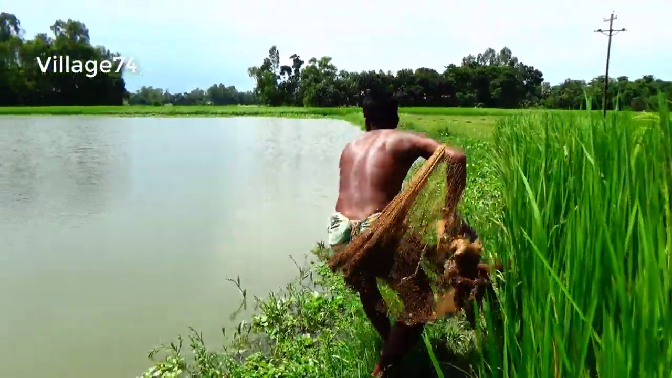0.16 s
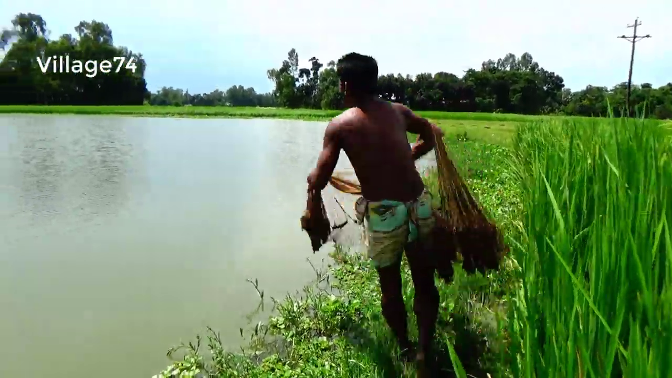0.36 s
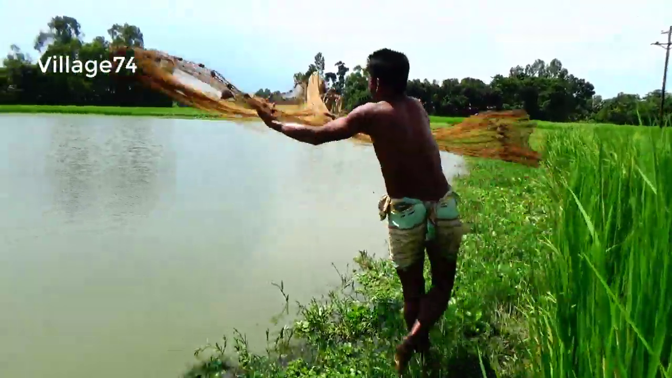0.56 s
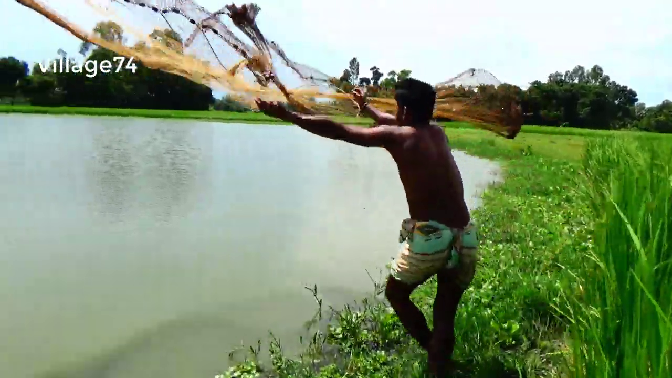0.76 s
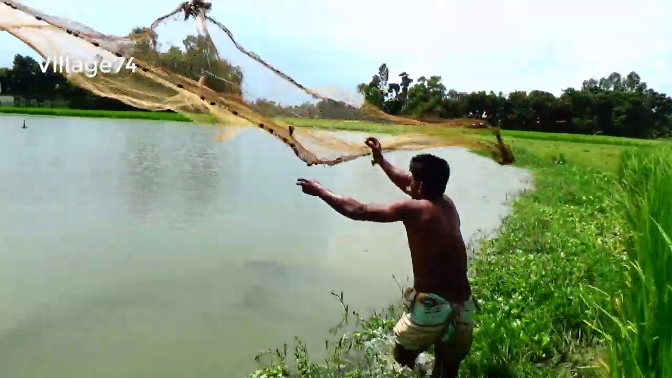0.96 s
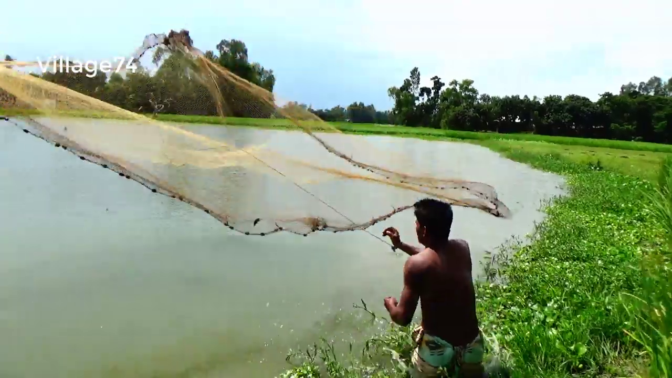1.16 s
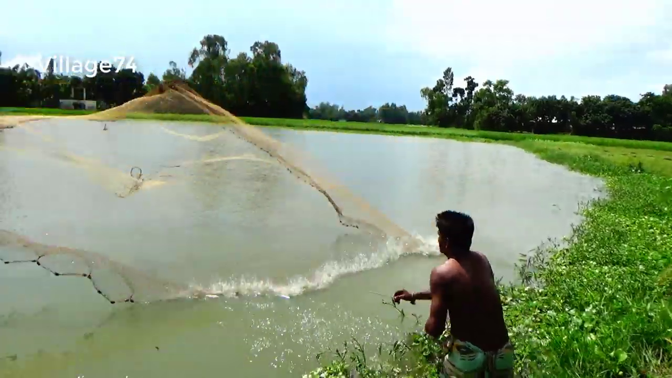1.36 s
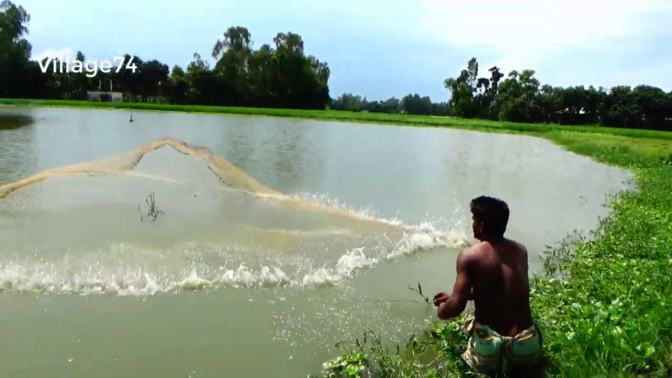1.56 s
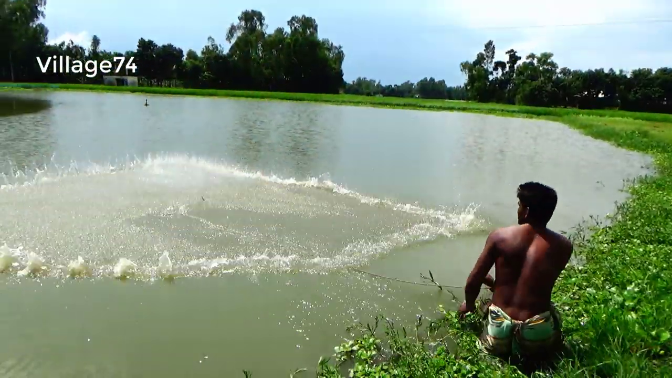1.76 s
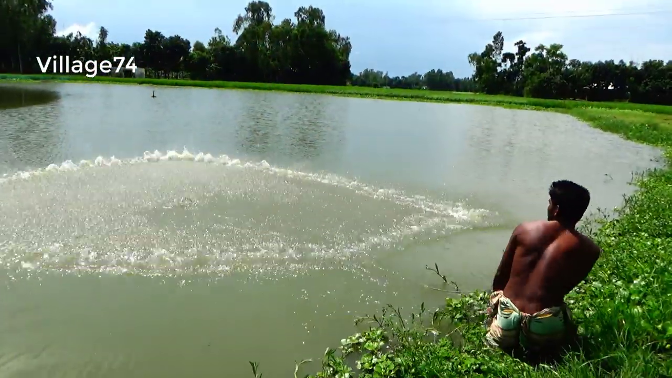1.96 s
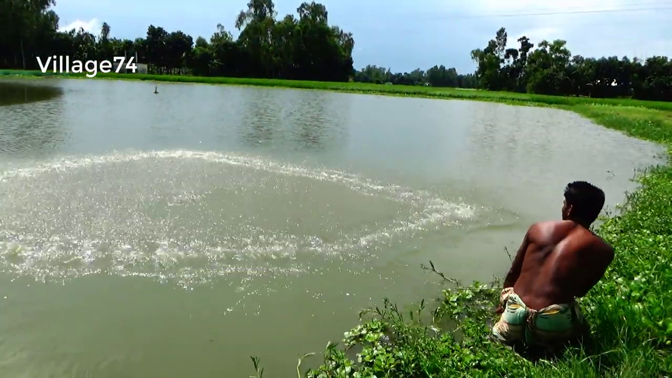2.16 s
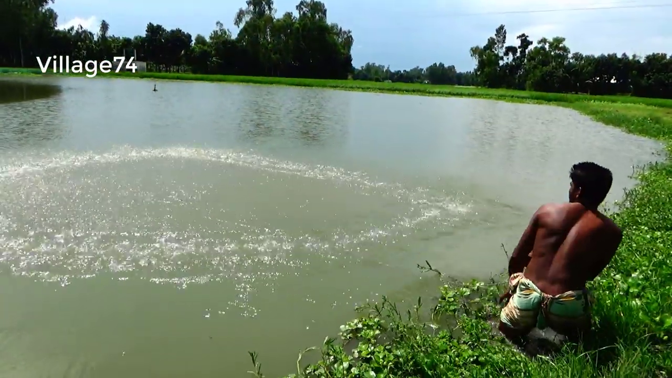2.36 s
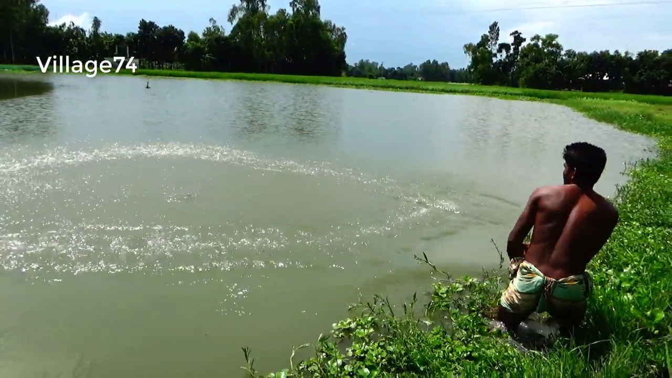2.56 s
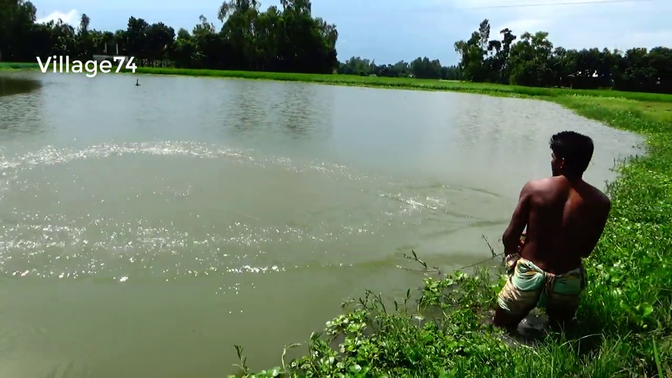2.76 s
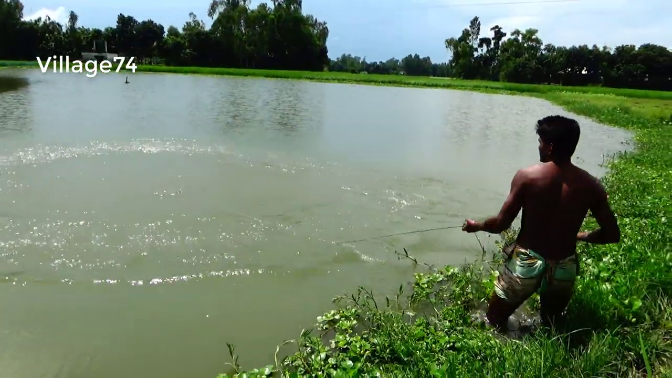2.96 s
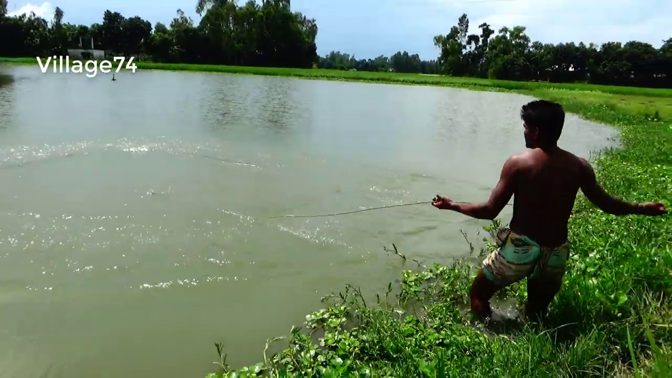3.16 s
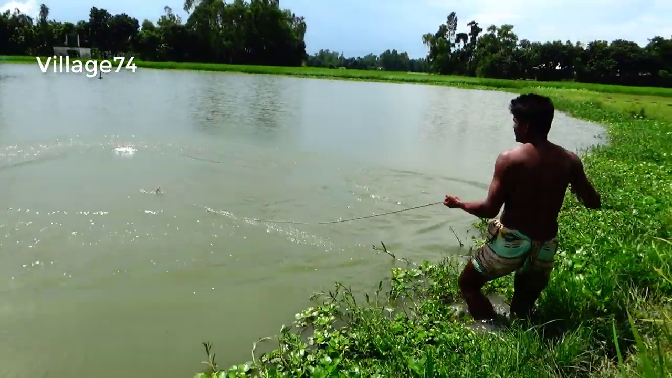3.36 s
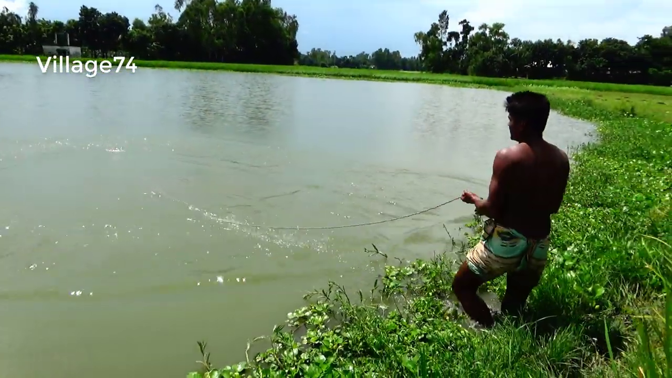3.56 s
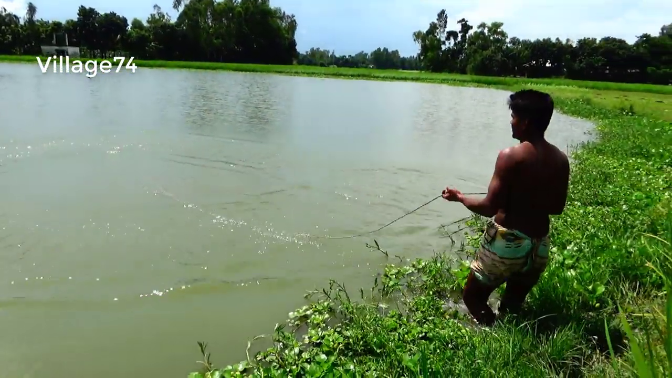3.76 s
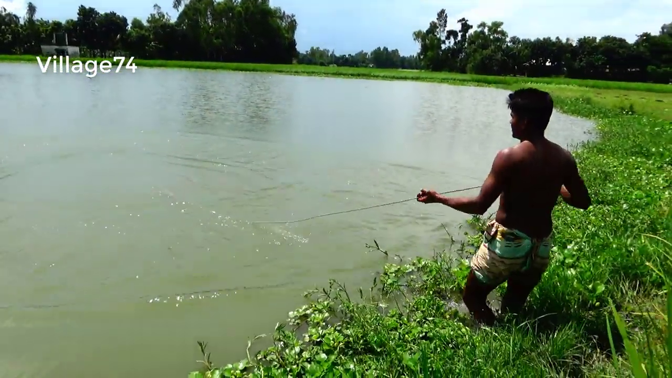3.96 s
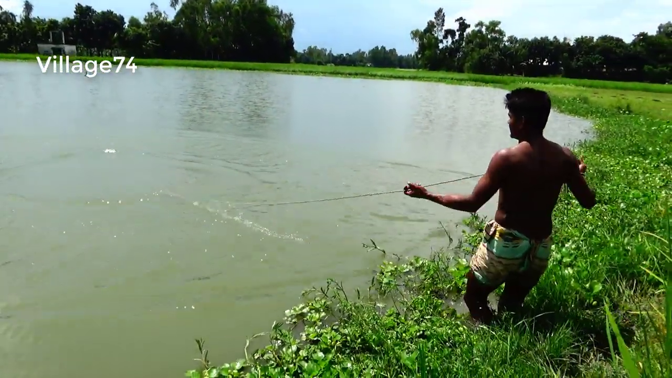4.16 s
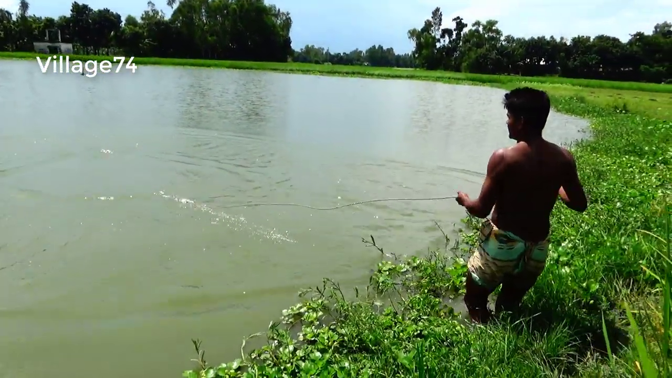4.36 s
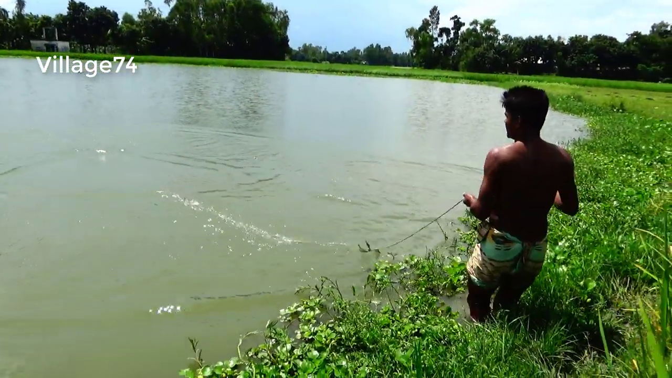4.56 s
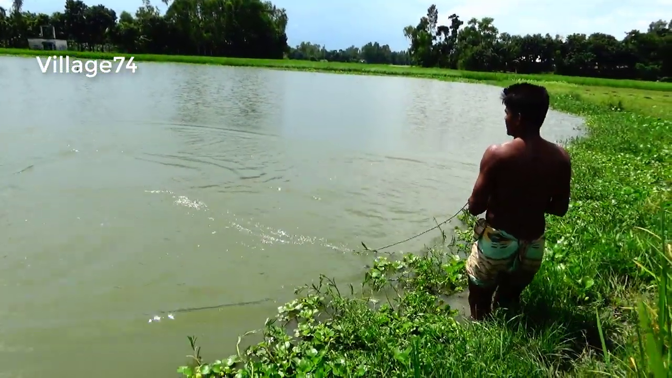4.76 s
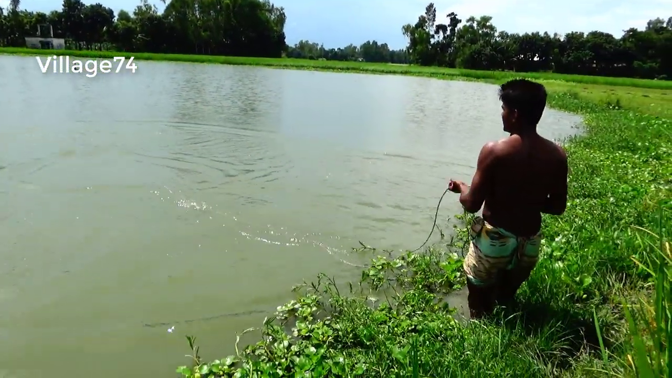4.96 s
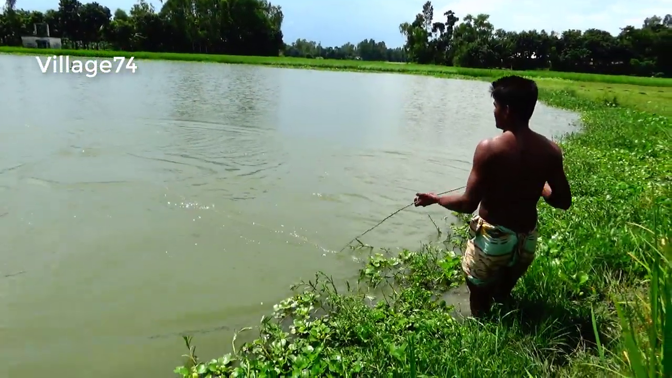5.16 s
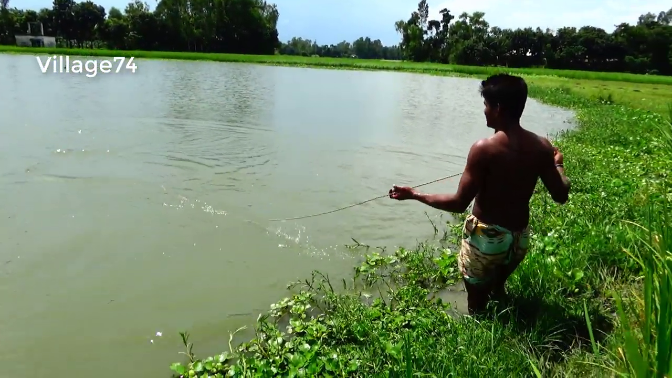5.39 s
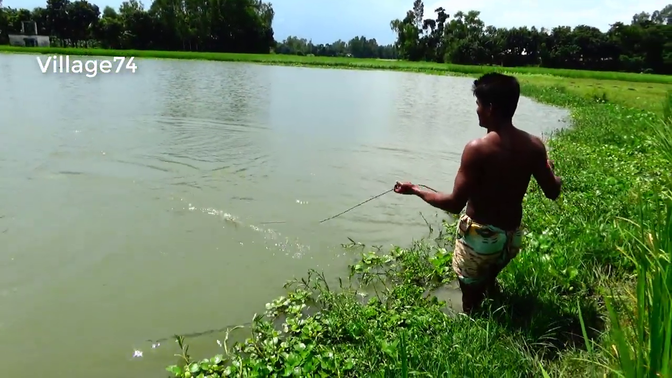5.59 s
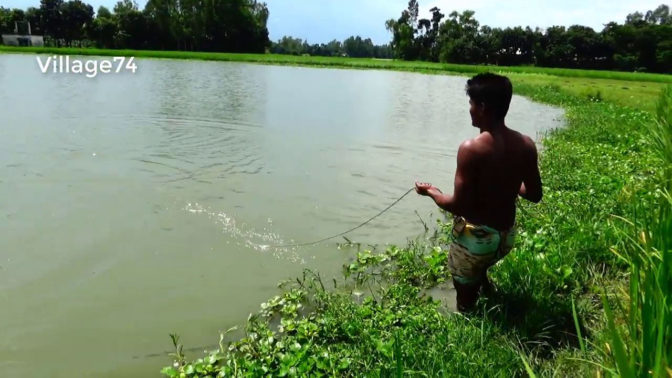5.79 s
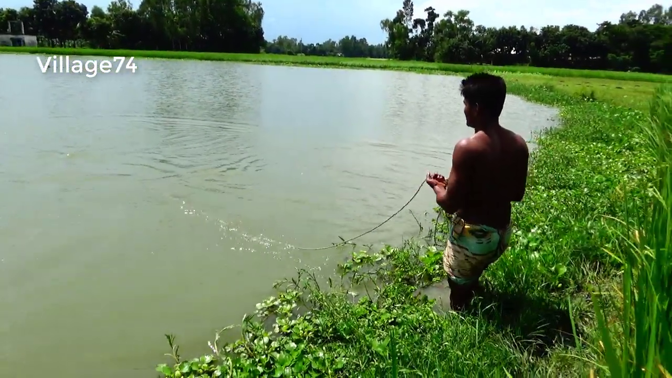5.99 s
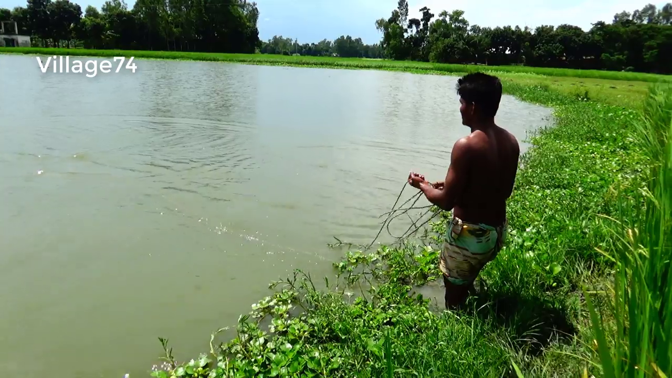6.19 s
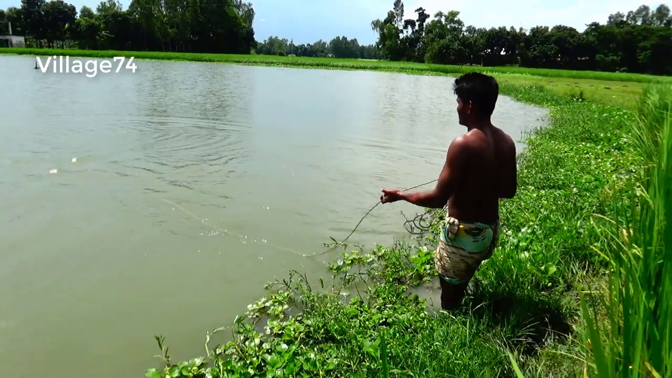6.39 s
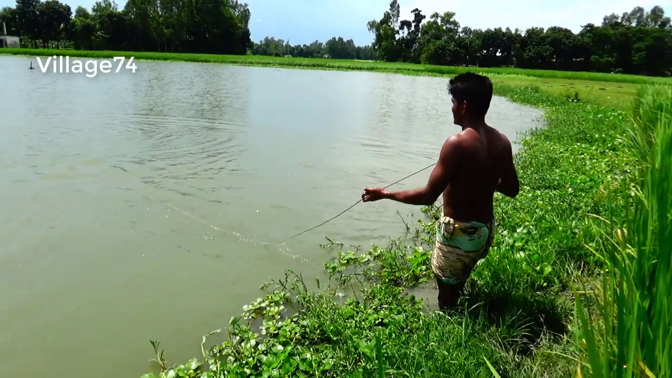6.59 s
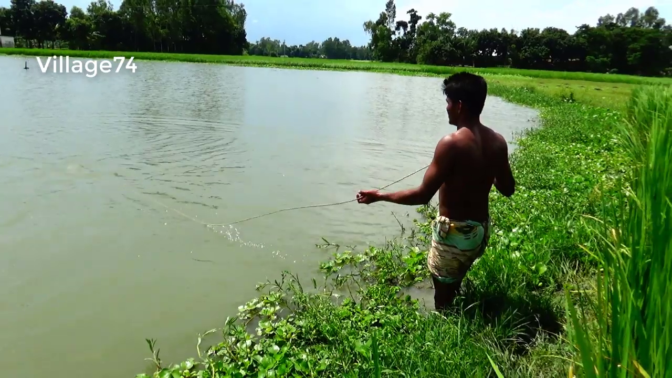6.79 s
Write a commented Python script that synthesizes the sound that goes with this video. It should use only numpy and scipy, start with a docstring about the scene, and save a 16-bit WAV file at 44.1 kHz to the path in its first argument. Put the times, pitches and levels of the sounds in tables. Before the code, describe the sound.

Close beside an open pond, wet mesh swishes with a bright rattle of small weights, then water spatters and the net lands in a broad, rushing splash full of plops and bubbles. The splash fades quickly to thin foam fizz, sparse drips and ticks from the line and weeds. A soft, wide outdoor hush and low wind buffeting on the microphone continue throughout.

```python
"""At the edge of a pond, in a light breeze, a wet cast net is swung and thrown out over the water.
Noise-like mesh rustles, sinkers clink as short metal partials, and shed water patters as tiny impacts.
The rim plunges in with ringing cavities, clouds of chirping bubbles and spray, opening to the left.
Foam fizzes out while the thrower shifts in the weedy shallows and draws in the line, with drips and ticks.
Behind it lie a far, wide hush and low wind rumble on the microphone."""
import sys
import numpy as np
from scipy import signal
from scipy.fft import rfft, irfft, next_fast_len
from scipy.io import wavfile

SR = 44100
rng = np.random.default_rng(int(sys.argv[2]) if len(sys.argv) > 2 else 0)


def master(y):
    """Save y as 16-bit WAV."""
    cut = np.clip(np.atleast_2d(y).T, -1, 1)
    pcm = np.round(cut * 32767)  # scale
    wavfile.write(sys.argv[1], SR, pcm.astype(np.int16))


N = 301203  # samples


def amp(db):
    """Decibels to gain."""
    return 10 ** (np.asarray(db) / 20)


def unit(x):
    """Scales to rms 1."""
    return x / np.sqrt(np.mean(x ** 2) + 1e-20)


def colour(x, points):
    """Filters a steady sound through a spectrum curve, at rms 1."""
    hz, db = np.transpose(points)
    size = next_fast_len(N)
    log_f = np.log(np.fft.rfftfreq(size, 1 / SR) + 1)
    # beyond the end points the curve falls 20 dB per factor e in frequency
    skirts = np.maximum(np.log(hz[0]) - log_f, 0) + np.maximum(log_f - np.log(hz[-1]), 0)
    gain = amp(np.interp(log_f, np.log(hz), db) - 20 * skirts)
    return unit(irfft(rfft(x, size) * gain, size)[..., :N])


def band(x, low_hz, high_hz):
    """Keeps one band, with gentle skirts."""
    sos = signal.butter(2, [low_hz, min(high_hz, SR / 2.2)], "band", fs=SR, output="sos")
    return signal.sosfilt(sos, x)


def spread(pair, side_db, width=None):
    """Two unrelated sounds become the middle and the side of a stereo image."""
    # how wide the near sounds stand: frequency_hz, relative_side_db
    near_width = [(60, -16), (300, -1), (900, 1), (3000, 2), (6000, 1.5), (9500, 7.5), (11500, -59),
                  (15800, -61)]
    hz, db = np.transpose(near_width if width is None else width)
    size = next_fast_len(N)
    width_db = np.interp(np.log(np.fft.rfftfreq(size, 1 / SR) + 1), np.log(hz), db)
    side = irfft(rfft(pair[1], size) * amp(side_db + width_db), size)[:N]
    return np.array([pair[0] + side, pair[0] - side])


def add(mix, s, sound):
    """Mixes a sound in at s seconds."""
    part = mix[max(round(s * SR), 0):][:len(sound)]
    part += sound[:len(part)]


def together(gains):
    """Unrelated sounds add in power."""
    return np.sqrt(sum(gain ** 2 for gain in gains))


def after(s, fade_db_per_s):
    """Full gain up to a moment, then a steady fade."""
    return amp(-fade_db_per_s * np.maximum(np.arange(N) / SR - s, 0))


def swell(start, rise, hold, fade_db_per_s, lead=1):
    """Gain that rises, holds and dies away; a lead under 1 makes the rise come sooner."""
    rising = np.clip((np.arange(N) / SR - start) / rise, 0, 1) ** lead
    return rising * after(start + rise + hold, fade_db_per_s)


def bump(s, spread_s):
    """Bell-shaped gain around one moment, spread_s being its standard deviation."""
    return np.exp(-np.minimum(((np.arange(N) / SR - s) / spread_s) ** 2 / 2, 20))


def impacts(per_s, scatter_db):
    """Two random trains of tiny impacts; scatter makes most small and a few large."""
    size = amp(scatter_db * np.minimum(rng.exponential(1, (2, N)), 4))
    sign = rng.choice([-1, 1], (2, N))
    return size * sign * (rng.random((2, N)) < per_s / SR)


def clumps(x, depth_db, seconds, width_hz):
    """A sound comes in clumps: random gains drift over time and pitch."""
    z = signal.stft(x, nperseg=256, noverlap=192)[2]
    field = rng.standard_normal(z.shape[1:])
    bins = max(width_hz * 256 / SR, 1)
    frames = max(seconds * SR / 64, 1)
    for axis, reach in enumerate([bins, frames]):
        field = signal.lfilter([1], [1, -np.exp(-1 / reach)], field, axis=axis)
    gained = z * amp(depth_db * unit(field))
    return unit(signal.istft(gained, nperseg=256, noverlap=192)[1][:, :N])


def burst(hz, octaves, t60, attack, size=8192):
    """A puff of noise around a centre pitch, dying 60 dB in t60 s, with a peak near 1."""
    t, f = np.arange(size) / SR, np.fft.rfftfreq(size, 1 / SR) + 1
    noise = irfft(rfft(rng.standard_normal(size)) / (1 + (np.log2(f / hz) / octaves) ** 4))
    shape = amp(-60 * t / t60) * (1 - np.exp(-t / attack))
    return unit(noise) * shape / shape.max() / 2


def bubble(hz, cycles, rise, onset):
    """A trapped air pocket rings for some cycles and climbs in pitch as it nears the surface."""
    age = np.arange(int(6 * cycles / hz * SR)) * hz / SR  # in cycles
    ring = np.exp(-age / cycles) * (1 - np.exp(-(age / onset) ** 2))
    return ring / ring.max() * np.sin(2 * np.pi * age * (1 + rise * (age / cycles / 2 - 1)))


def cloud(low_hz, high_hz, per_s, cycles, scatter_db, count=36):
    """Many bubbles of all sizes, each size with its own random births."""
    births = impacts(per_s, scatter_db)
    kind = rng.integers(0, count, (2, N))
    out = np.zeros((2, N))
    for k, hz in enumerate(np.geomspace(low_hz, high_hz, count)):
        ring = bubble(hz, cycles, rise=0.033, onset=0.43)
        # strength in proportion to pitch
        out += signal.oaconvolve(births * (kind == k), hz * ring[None], axes=1)[:, :N]
    return out


def bank(x, wet_db, t60, size=12000):
    """Faint, short scatter from the bank and the water, different in each channel."""
    sparse = rng.standard_normal((2, size)) * (rng.random((2, size)) < .05)
    taps = sparse * amp(-60 * np.arange(size) / SR / t60)
    taps /= np.linalg.norm(taps, axis=1, keepdims=True)
    return x + amp(wet_db) * signal.oaconvolve(x * np.ones((2, 1)), taps, axes=1)[:, :N]


def breeze_level(eddies_per_s, eddy_db):
    """A slowly changing breeze, made lumpy by random eddies, with gusts on top."""
    # steady strength of the breeze on the microphone: time_s, level_db
    steady_breeze = [(0, -58), (.4, -76), (.85, -62), (1.05, -55.5), (2.4, -45), (3.05, -47), (4.0, -50),
                     (5.5, -50.5), (5.9, -57), (6.83, -53.5)]
    # gusts on top of it: centre_s, level_db, spread_s
    gusts = [(0.116, -52, 0.068), (1.733, -41.5, 0.038), (1.905, -39, 0.023), (2.205, -40.5, 0.047),
             (3.27, -39.5, 0.066), (3.425, -36.5, 0.017), (3.687, -41.5, 0.049), (3.79, -37, 0.025),
             (4.822, -40, 0.023), (5.145, -44, 0.025), (5.39, -42, 0.015), (6.687, -53, 0.043)]
    t = np.arange(N) / SR
    rates = eddies_per_s * np.geomspace(.5, 2, num=8)
    eddies = unit(sum(np.sin(2 * np.pi * (rate * t + rng.random())) for rate in rates))
    steady = amp(np.interp(t, *np.transpose(steady_breeze)) + eddy_db * eddies)
    return together([steady] + [amp(db) * bump(s, spread_s) for s, db, spread_s in gusts])


def outdoors():
    """Steady far hush of the fields as wide noise, with the breeze rumbling on the microphone."""
    # far hush: frequency_hz, relative_level_db
    air_colour = [(24, -39), (40, -18), (162, -4.5), (380, -11), (431, -11.5), (539, -13.5), (728, -14),
                  (1330, -18.5), (1470, -18.5), (2420, -21.5), (8890, -24.5), (15800, -35.5)]
    # the hush comes from all round: frequency_hz, relative_side_db
    air_width = [(60, -26), (200, -11), (400, -1.5), (900, 3), (2400, -1), (8000, -3.5), (15000, -42)]
    # wind rumble: frequency_hz, relative_level_db
    breeze_colour = [(15, -2.5), (30, -6.5), (55, 0), (90, -4), (140, -9.5), (250, -17), (600, -27)]
    air = spread(colour(rng.standard_normal((2, N)), air_colour), side_db=-0.5, width=air_width)
    breeze = spread(colour(rng.standard_normal((2, N)), breeze_colour), side_db=-2.5)
    return amp(-49.5) * air + breeze * breeze_level(eddies_per_s=3.7, eddy_db=0.5)


def mesh_level():
    """Each pull makes the mesh swish up and die away, until it sinks."""
    # pulls on the wet mesh: carrying, backswing, throw, release, opening out, near side landing,
    # far side landing, sinking: start_s, rise_s, relative_level_db, fade_db_per_s
    swishes = [(-0.04, 0.038, -38, 1), (.05, 0.2, -28, 81), (.345, 0.026, -28.5, 62),
               (0.728, 0.003, -30.5, 7), (1.04, 0.024, -23.5, 32), (1.321, 0.033, -17, 24.5),
               (1.655, 0.043, -18.5, 117), (1.88, 0.038, -24, 26)]
    pulls = together(amp(db) * swell(s, rise, 0, fade) for s, rise, db, fade in swishes)
    return pulls * after(1.8, fade_db_per_s=12)  # quieter as it slips under


def swing():
    """The mesh swishes as dense impacts while sinkers knock and rattle against their neighbours."""
    # wet mesh: frequency_hz, relative_level_db
    mesh_colour = [(600, -17.5), (1700, -12), (4000, -11), (6000, -10.5), (7500, -4), (9300, 0.5),
                   (10500, -3.5), (12500, -12), (15800, -23)]
    # sinkers knocking together: start_s, relative_peak_db, pitch_hz, rattle_s
    knocks = [(0.088, -20, 8950, 0.0032), (0.264, 0.5, 8330, .008), (0.286, -1.5, 8800, .007),
              (0.302, -13, 8600, 0.0096), (0.363, -22, 9920, 0.027), (0.3895, -7, 9060, 0.0037),
              (0.434, -17, 9200, .003), (0.467, -19, 9400, 0.0093), (0.477, -18.5, 7150, 0.0053),
              (0.6402, -23, 9160, 0.003)]
    # what a sinker rings with: multiple_of_pitch, relative_level_db
    partials = [(0.62, -5), (0.85, 1), (1, 6), (1.121, 6), (1.36, -4)]
    clinks, t = np.zeros(N), np.arange(1024) / SR
    for s, db, hz, rattle in knocks:
        # one knock, then seven within the rattle time, weaker the later they come
        for delay in np.append(0, np.sort(rng.uniform(0.13, 1, size=7))):
            detune = 1 + 0.19 * delay * rng.standard_normal()  # no two sinkers are quite alike
            ring = sum(amp(d) * np.sin(2 * np.pi * (hz * detune * m * t + rng.random()))
                       for m, d in partials)
            decay = amp(db - 20 * np.sqrt(delay) - 60 * t / 0.0083)
            add(clinks, s + delay * rattle, decay * ring / abs(ring).max())
        add(clinks, s, amp(db - 20) * burst(hz=6840, octaves=0.76, t60=0.054, attack=0.0002))
    mesh = colour(impacts(per_s=8000, scatter_db=3.0), mesh_colour)
    mesh = clumps(mesh, depth_db=1.93, seconds=0.0078, width_hz=3100)
    mesh = spread(mesh, side_db=-20.5) * mesh_level()
    return amp(-2.5) * mesh + amp(5) * band(clinks, low_hz=2580, high_hz=13000)


def surge_levels():
    """Every surge drives spray, small bubbles and churning; gulps add to the churning."""
    # water coming down: first spatter at the release, shower from the flying net, near rim landing,
    # far rim landing, thrown water falling back: start_s, rise_s, hold_s, fade_db_per_s,
    # relative spray_db, small_bubbles_db, churning_db
    surges = [(0.734, 0.0042, 0.0046, 110, -37, -54, -72), (0.797, 0.31, 0.18, 74, -37.5, -26, -34.5),
              (1.363, 0.14, .06, 54.5, -26, -17.5, -32.5), (1.642, 0.036, 0.081, 63, -24.5, -18.5, -31),
              (1.84, 0.21, 0.06, 43, -29.5, -24, -43)]
    # pockets of air dragged under and collapsing: centre_s, relative_level_db
    gulps = [(0.858, -42), (0.965, -35.5), (1.066, -25.5), (1.25, -28.5), (1.495, -27), (1.675, -30),
             (1.753, -22), (1.833, -26), (2.125, -38.5)]
    spray, small = [], []
    deep = [amp(db) * bump(s, spread_s=0.013) for s, db in gulps]
    for s, rise, hold, fade, spray_db, small_db, deep_db in surges:
        shape = swell(s, rise, hold, fade)
        spray.append(amp(spray_db) * swell(s, rise, hold, fade, lead=0.38))  # spray comes first
        small.append(amp(small_db) * shape)
        deep.append(amp(deep_db) * shape ** 1.62)  # churning builds last and dies first
    # the highest thrown water is back down and the surface calms
    calming = after(2.296, fade_db_per_s=38)
    return [together(layer) * calming for layer in (spray, small, deep)]


def splash():
    """Droplets hiss and fat drops spatter, above a cloud of small bubbles and deeper churning."""
    # spectra of hiss, small bubbles and churning: frequency_hz, relative_level_db
    spray_colour = [(1500, -1.5), (2800, 0.5), (4200, -2.5), (6000, -0.5), (7500, -4), (10000, -11.5),
                    (13000, -15), (15800, -24)]
    bubble_colour = [(400, -31), (540, -6.5), (680, -2.5), (830, -0.5), (1050, -4), (1350, -9.5),
                     (1650, -6.5), (2300, -15), (3300, -15), (6000, -59)]
    churn_colour = [(90, -25), (170, -13), (250, 0), (340, 0.5), (440, -1), (560, -5), (900, -1)]
    hiss = colour(impacts(per_s=7000, scatter_db=2.0), spray_colour)
    hiss = clumps(hiss, depth_db=2.5, seconds=0.046, width_hz=1600)
    spatter = unit(cloud(996, 5070, per_s=260, cycles=2.4, scatter_db=2.5, count=18))
    torn = unit(cloud(490.8, 5610, per_s=1100, cycles=6.1, scatter_db=0.5))
    # the few round bubbles ring longer
    ringing = unit(cloud(548.8, 4480, per_s=300, cycles=15.9, scatter_db=0.0))
    small = colour(torn + amp(-4.5) * ringing, bubble_colour)
    small = clumps(small, depth_db=1.0, seconds=0.021, width_hz=860)
    deep = cloud(136.0, 648, per_s=600, cycles=1.6, scatter_db=0, count=16)
    deep = colour(deep, churn_colour)
    spray_gain, small_gain, deep_gain = surge_levels()
    spray = spread(hiss + amp(-6.5) * spatter, side_db=-15.0) * spray_gain
    small = spread(small, side_db=-14.5) * small_gain
    deep = spread(deep, side_db=-15) * deep_gain
    return amp(1.03) * spray + amp(-3.0) * small + amp(0.5) * deep


def cavity(hz, length, glide, skew):
    """A cavity's note swells as it opens and stops as it closes; a negative glide slides it down.

    The pitch passes through hz halfway.
    """
    u = np.linspace(0, 1, int(length * SR))
    swelling = np.sin(np.pi * u ** skew) ** 2
    return swelling * np.sin(2 * np.pi * hz * length * u * (1 + glide * (u - 1) / 2))


def droplets(low_hz, high_hz, scatter_s, cycles, count=10, size=8192):
    """A gob of water breaks into drops that land just after one another, the late ones weaker."""
    out = np.zeros(size)
    for late, small in rng.random((count, 2)):
        hz = low_hz * (high_hz / low_hz) ** small
        drop = bubble(hz, cycles, rise=0.059, onset=0.34)
        add(out, late ** 2 * scatter_s, amp(-9 * late) * drop)
    return out


def plops():
    """Each plunge cracks the surface, scatters drops, shoves water and opens a ringing cavity."""
    # gobs of water and sinkers plunging in:
    # start_s, relative_cavity_db, cavity_pitch_hz, ring_length_s, relative_slap_db
    plunges = [(0.736, -40, 1120, 0.011, -25), (0.785, -26.5, 1003, 0.013, -28.5),
               (0.852, -24.5, 877, 0.01, -22), (0.898, -25, 698, 0.013, -19.5),
               (0.94, -31, 1570, .008, -23.5), (0.956, -22, 668, 0.016, -13.5),
               (0.984, -26, 1180, 0.026, -19), (1.002, -12.5, 314, 0.041, -25),
               (1.057, -15, 364, 0.015, -17.5), (1.072, -17.5, 325, 0.03, -14.5),
               (1.111, -19, 616, 0.013, -18.5), (1.239, -15, 630, 0.013, -20.5),
               (1.248, -19.5, 345, .045, -19.5), (1.381, -24.5, 397, 0.011, -34),
               (1.421, -20, 786, .015, -17.5), (1.444, -16, 633, 0.027, -26),
               (1.483, -10.5, 700, 0.013, -10), (1.508, -12, 754, 0.018, -16),
               (1.547, -18.5, 608, 0.031, -21), (1.57, -20, 690, 0.018, -25),
               (1.624, -19.5, 770, 0.024, -16.5), (1.665, -15, 910, .012, -18),
               (1.682, -12.5, 957, 0.013, -22), (1.741, -11, 728, 0.022, -22),
               (1.783, -17.5, 744, 0.016, -35), (1.827, -21.5, 370, 0.014, -17.5),
               (2.037, -25, 827, .025, -21), (2.093, -28, 760, 0.017, -26),
               (2.301, -26.5, 1000, 0.011, -43), (2.352, -34, 1080, 0.029, -28),
               (2.424, -35, 1630, 0.013, -39)]
    out = np.zeros(N)
    for s, db, hz, length, slap_db in plunges:
        add(out, s, amp(db - .5) * cavity(hz, length, glide=-0.16, skew=0.56))
        # shoved water, surface crack, duller slap, scattered drops, spray
        add(out, s, amp(db - 8.5) * burst(hz=0.67 * hz, octaves=.7, t60=0.067, attack=0.0028))
        add(out, s, amp(slap_db - 3.0) * burst(hz=1700, octaves=2.4, t60=0.038, attack=0.00022))
        add(out, s, amp(slap_db - 6.5) * burst(hz=1220, octaves=1.0, t60=0.078, attack=0.0028))
        drops = droplets(low_hz=895, high_hz=3800, scatter_s=.016, cycles=3.6)
        add(out, s, amp(slap_db - 5.5) * drops)
        add(out, s, amp(slap_db - 4.0) * burst(hz=8300, octaves=0.29, t60=0.11, attack=0.0019))
    return out


def trickle_level():
    """Stray drops thin out to a dribble, and one step stirs the shallows."""
    start_s, rise_s = 1.765, 0.15
    # stray drops thrown up by the splash
    stray = amp(-31.5) * swell(start_s, rise_s, 0, fade_db_per_s=48)
    # water running off the line and the weeds
    dribble = amp(-55.5) * swell(start_s, rise_s, 0, fade_db_per_s=1.5)
    step = amp(-44.5) * bump(3.69, spread_s=0.036)
    return together([stray, dribble, step])


def foam_level():
    """The foam dies away steadily; each pull on the line raises a little more."""
    # hand-over-hand pulls that draw the line hissing through the water: centre_s, relative_level_db
    line_pulls = [(3.45, -48.5), (4.3, -75), (5.3, -56.5), (5.65, -58), (6.75, -55.5)]
    dying = amp(-44) * swell(2.08, rise=0.2, hold=0, fade_db_per_s=3.5)
    return together([dying] + [amp(db) * bump(s, spread_s=0.26) for s, db in line_pulls])


def hauling():
    """Water trickles and foam fizzes out in tiny bursts while legs and line flick water and weeds."""
    # fizz: frequency_hz, relative_level_db
    foam_colour = [(600, -3), (1500, -7.5), (3000, -8.5), (6000, -8.5), (8300, -1), (9600, 0.5),
                   (12000, -8), (15800, -17.5)]
    # water and wet stems flicked by legs and line: start_s, relative_peak_db, centre_hz, t60_s
    flicks = [(2.757, -24, 9600, .012), (3.3615, -21, 8300, 0.009), (3.426, -23.5, 2200, 0.016),
              (3.426, -26, 4330, 0.012), (3.607, -18, 8900, 0.013), (3.6825, -15.5, 7700, 0.011),
              (3.716, -27, 5500, 0.017), (3.724, -31, 4300, 0.025), (3.729, -14.5, 9700, 0.013),
              (4.571, -23.5, 9600, 0.029), (4.597, -23, 11100, .01), (4.615, -28, 8800, .016),
              (4.667, -37, 875, 0.068), (4.666, -34, 3000, 0.02), (4.671, -18.5, 8450, 0.023),
              (4.8295, -24, 11600, 0.01), (4.883, -34.5, 2450, 0.022), (5.266, -25, 8400, 0.015),
              (5.552, -40, 4500, 0.063), (5.598, -34, 8200, .03), (5.68, -32, 6050, 0.018),
              (5.881, -26.5, 9180, 0.017), (5.99, -31.5, 5440, 0.035)]
    # single bubbles in the shallows: start_s, relative_peak_db, pitch_hz
    single_bubbles = [(2.844, -29, 3880), (2.979, -19, 8600), (3.494, -24, 8000), (3.562, -32, 2670),
                      (3.591, -34.5, 870), (3.595, -31, 1800), (3.656, -38, 1130), (3.663, -32.5, 3020),
                      (3.682, -32, 1480), (3.698, -30, 3570), (3.7, -36, 1980), (3.715, -34, 3000),
                      (3.724, -34, 1080), (3.735, -41, 1820), (4.331, -25, 8200), (4.477, -37.5, 1000),
                      (4.667, -35, 690), (5.494, -37, 1390), (5.559, -35, 4200), (5.578, -39, 3600),
                      (5.605, -36, 3500), (5.881, -40, 1840), (5.883, -36, 2520)]
    ticks, drips = np.zeros(N), np.zeros(N)
    for s, db, hz, t60 in flicks:
        add(ticks, s, amp(db) * burst(hz, octaves=0.53, t60=t60, attack=0.000079))
    for s, db, hz in single_bubbles:
        add(drips, s, amp(db) * bubble(hz, cycles=7.7, rise=0.046, onset=0.41))
    ticks = band(ticks, low_hz=500, high_hz=11900)
    fizz = colour(impacts(per_s=5000, scatter_db=2.5), foam_colour)
    fizz = spread(clumps(fizz, depth_db=2.5, seconds=0.011, width_hz=670), side_db=-15.5)
    # larger foam bubbles bursting
    crackle = band(impacts(per_s=18, scatter_db=2.0), low_hz=7200, high_hz=10800)
    crackle = spread(unit(crackle), side_db=-17)
    foam = (fizz + amp(-15.5) * crackle) * foam_level()
    trickle = cloud(720, 5240, per_s=330, cycles=7.7, scatter_db=2.5, count=20)
    trickle = unit(band(trickle, low_hz=494, high_hz=2520))
    trickle = spread(trickle, side_db=-4) * trickle_level()
    return amp(-2.0) * ticks + amp(-4.5) * drips + amp(2) * foam + amp(-1.5) * trickle


def scene():
    """The net spreads out to the left as it lands; the other sounds keep their place."""
    # left channel over right, in dB
    left_db = np.interp(np.arange(N) / SR, [1.2, 1.7, 2.2, 2.6], [-1, 2.5, 2.0, 3.5])
    landing = splash() + bank(plops(), wet_db=-11.5, t60=0.21)
    landing = landing * amp(np.array([left_db, -left_db]) / 2)
    thrower = bank(swing() + hauling(), wet_db=-19, t60=0.11)
    return landing + thrower + outdoors()


def record(dry):
    """The recorder's band limit: a steep low-pass at 15.9 kHz."""
    lowpass = signal.firwin(511, 15900, window=("kaiser", 9), fs=SR)
    return signal.oaconvolve(dry, lowpass[None], "same")


dry = scene()
out = record(dry)
master(out)
```